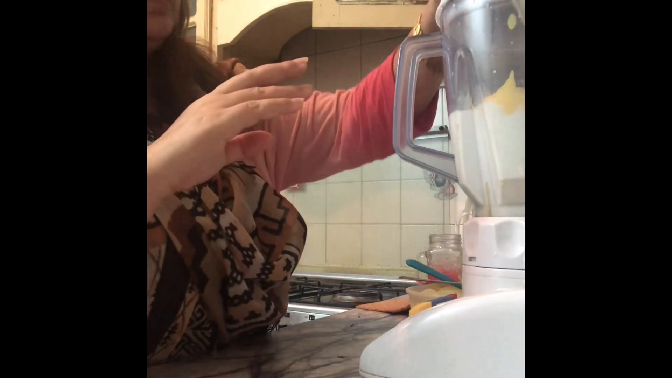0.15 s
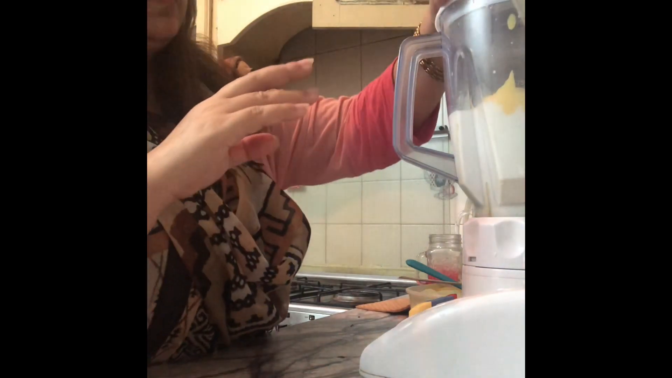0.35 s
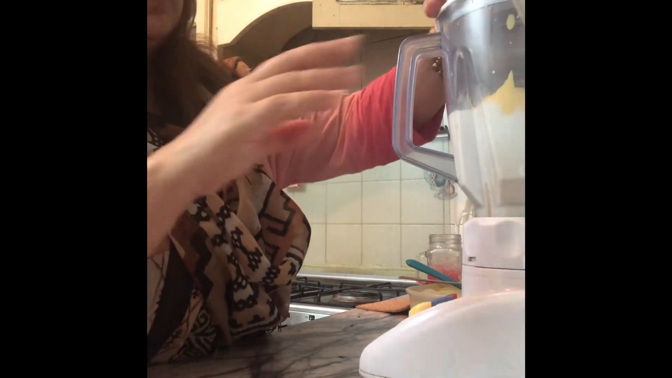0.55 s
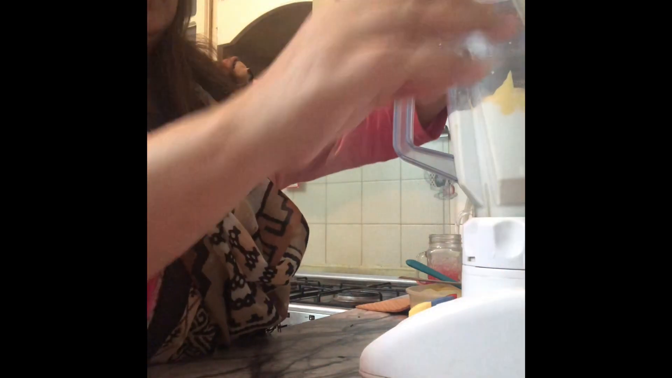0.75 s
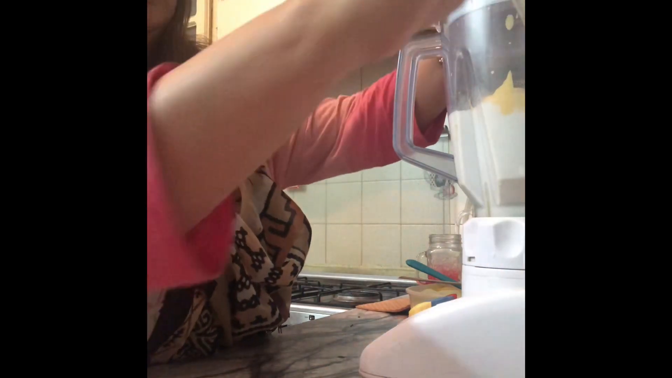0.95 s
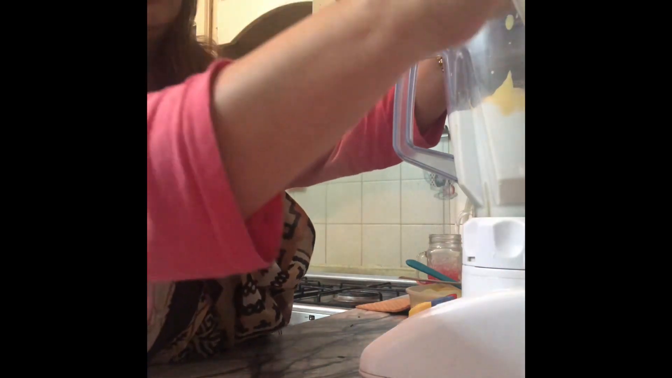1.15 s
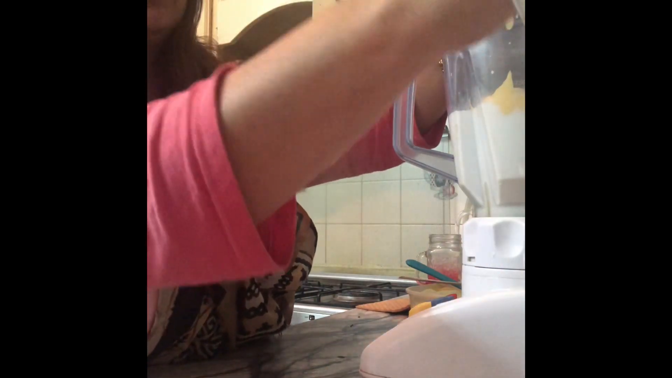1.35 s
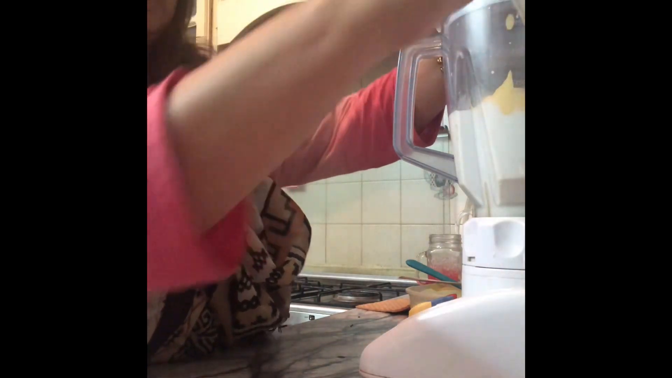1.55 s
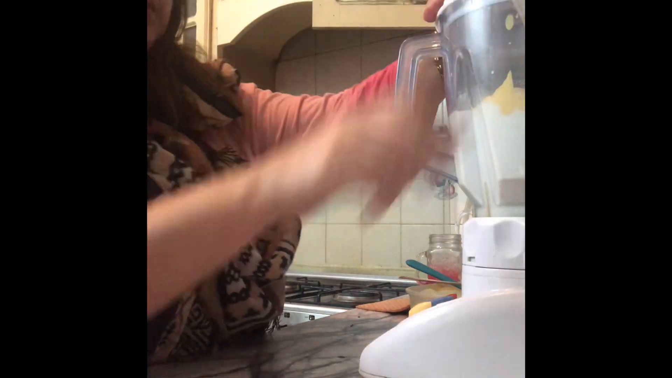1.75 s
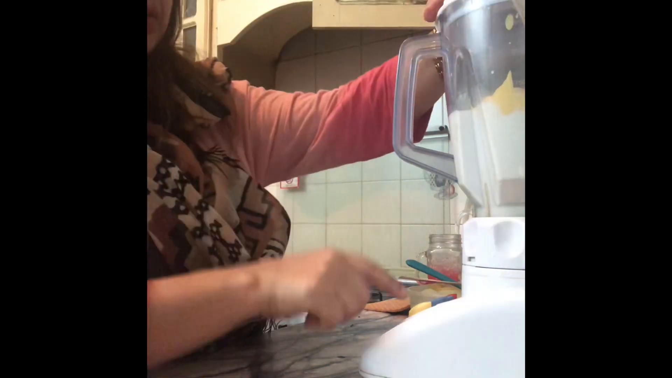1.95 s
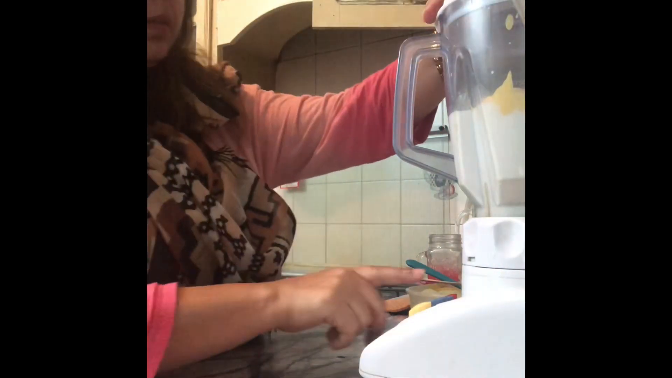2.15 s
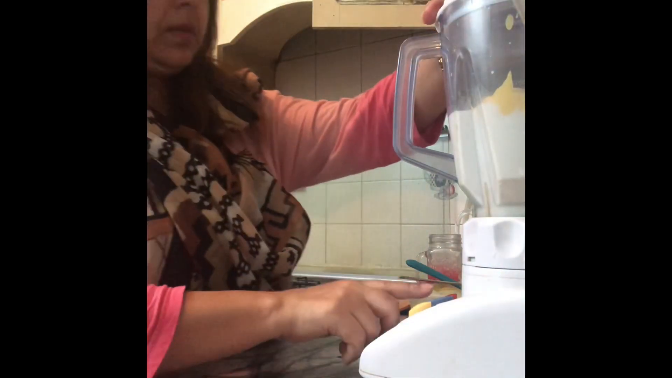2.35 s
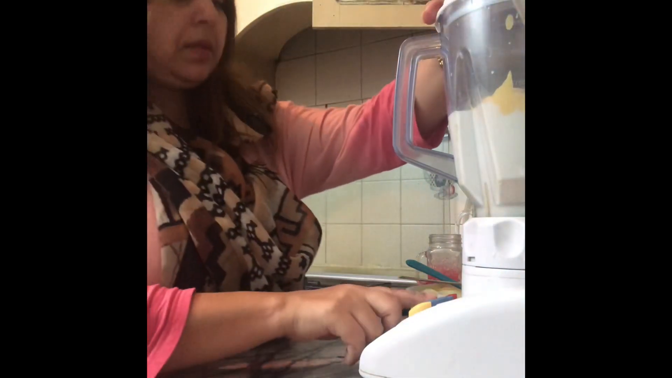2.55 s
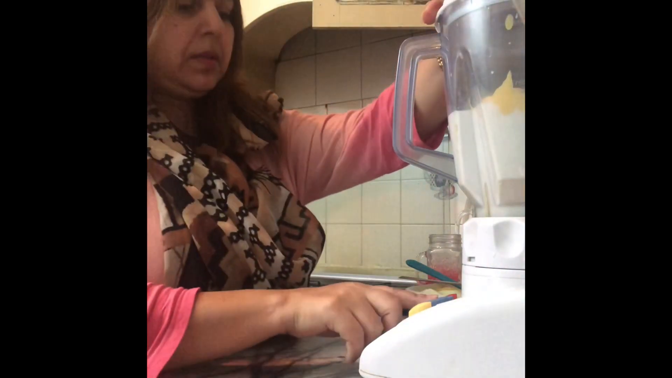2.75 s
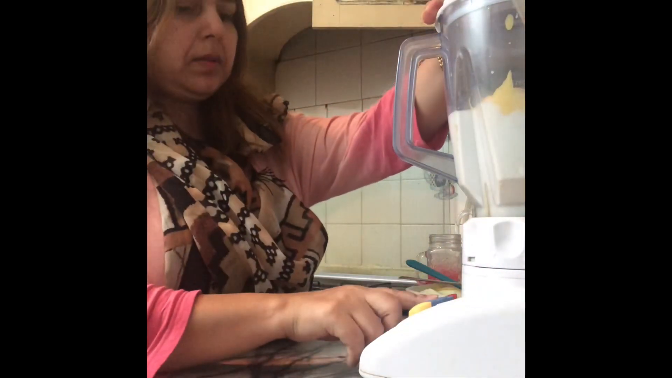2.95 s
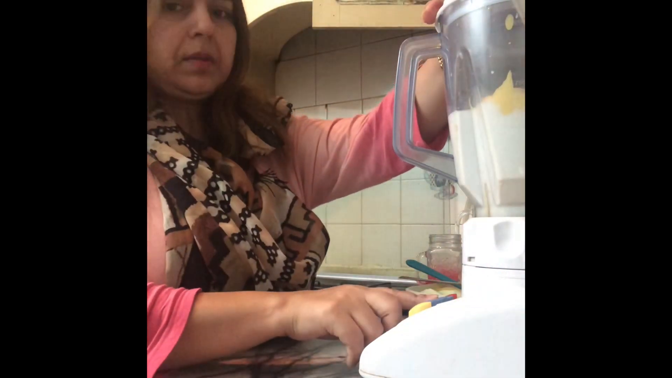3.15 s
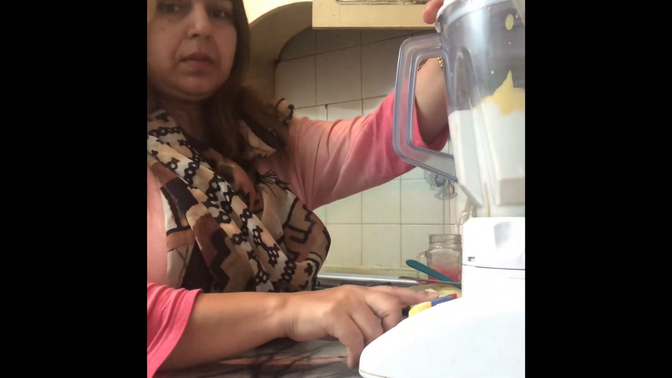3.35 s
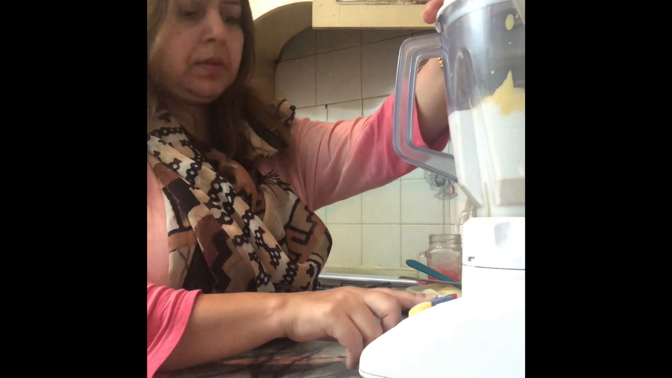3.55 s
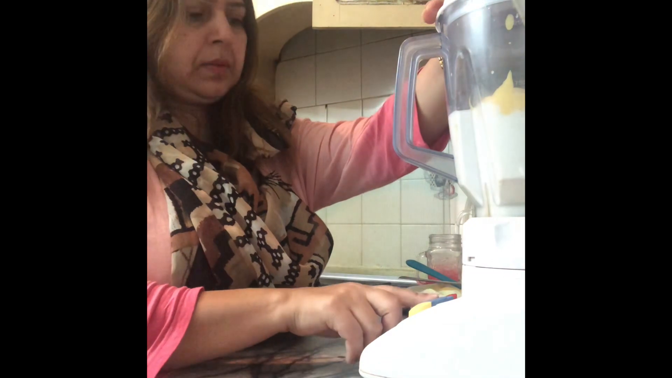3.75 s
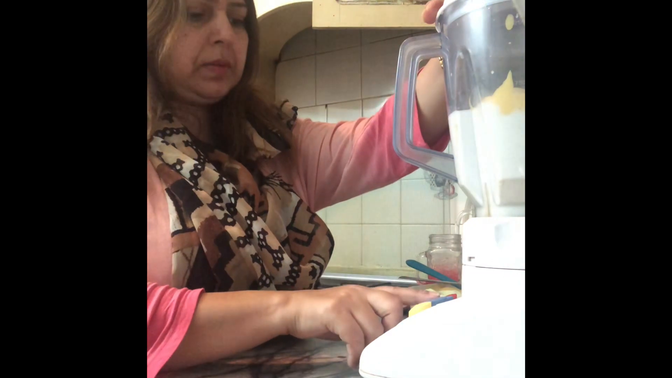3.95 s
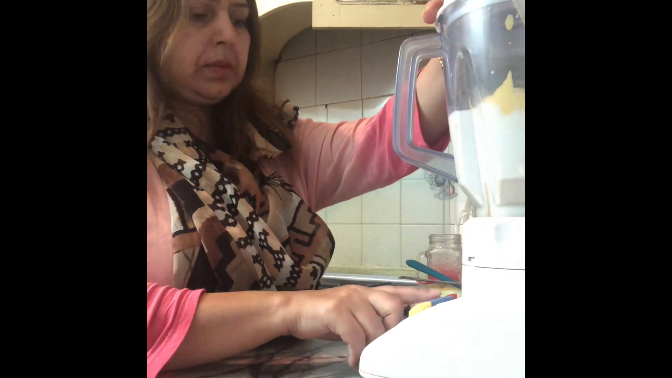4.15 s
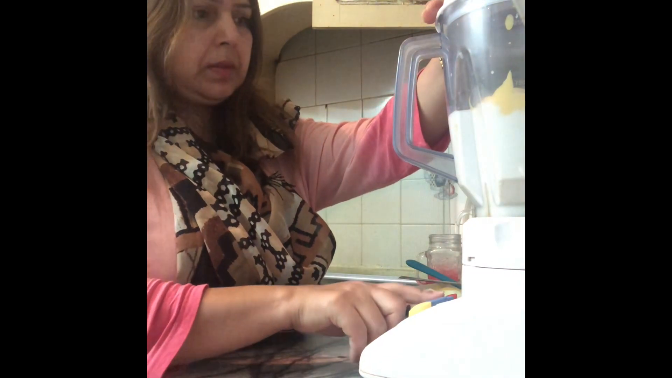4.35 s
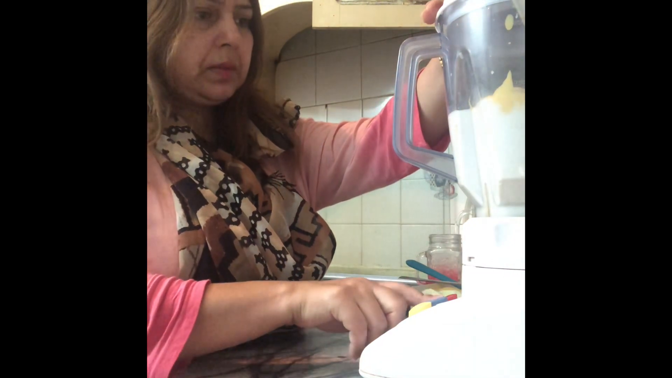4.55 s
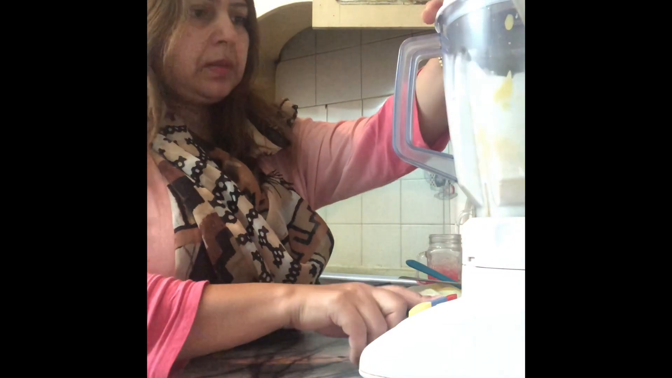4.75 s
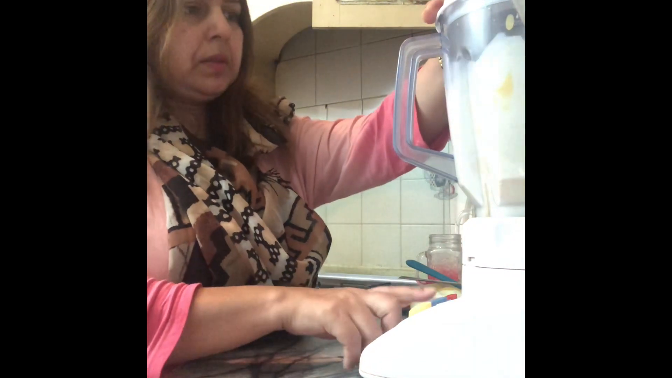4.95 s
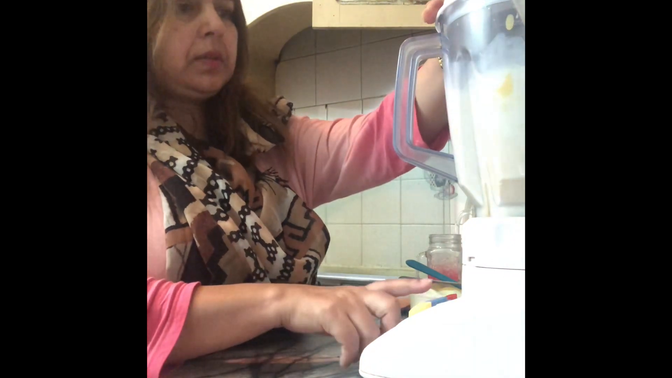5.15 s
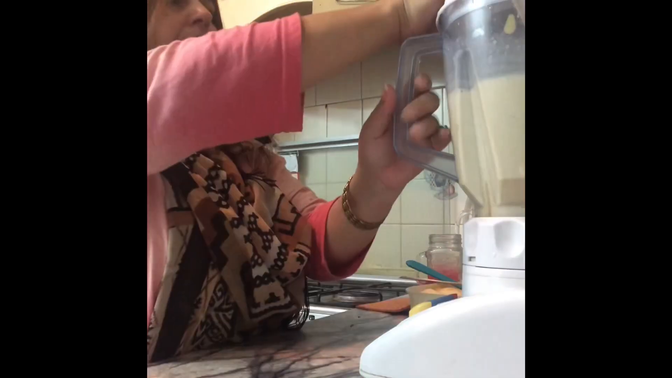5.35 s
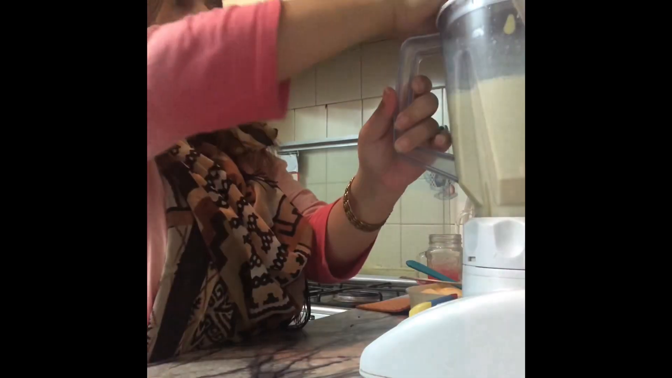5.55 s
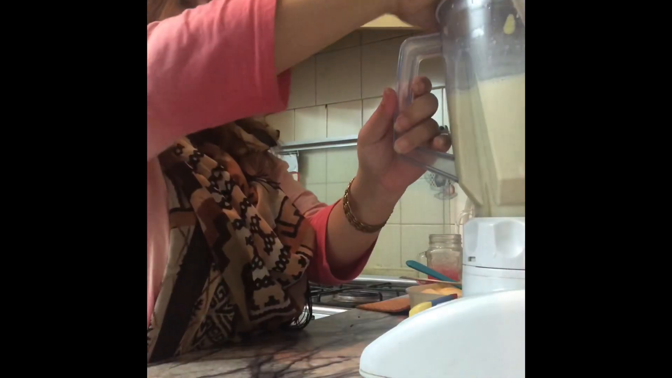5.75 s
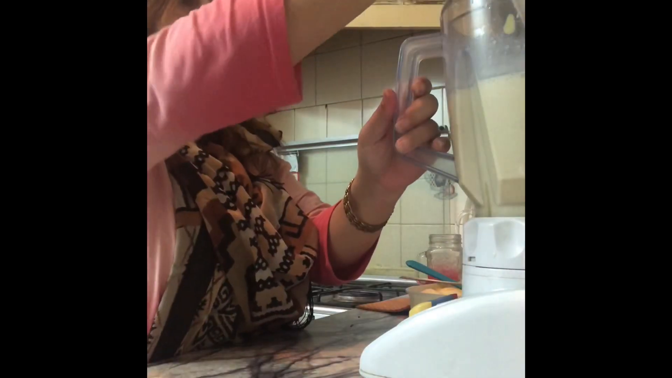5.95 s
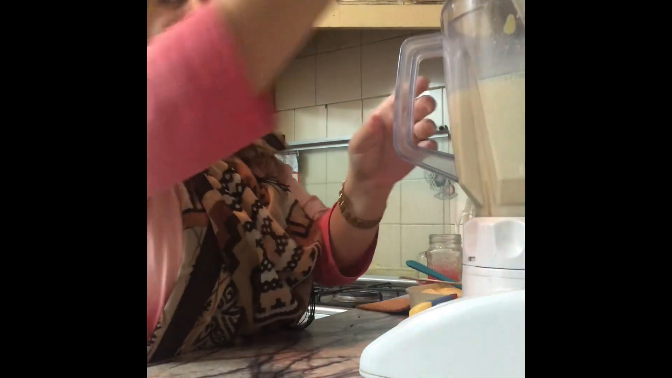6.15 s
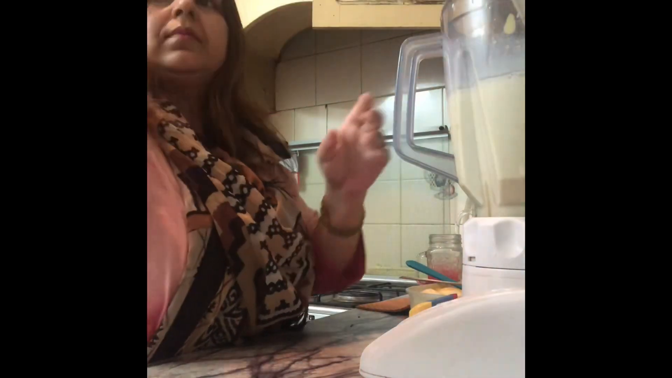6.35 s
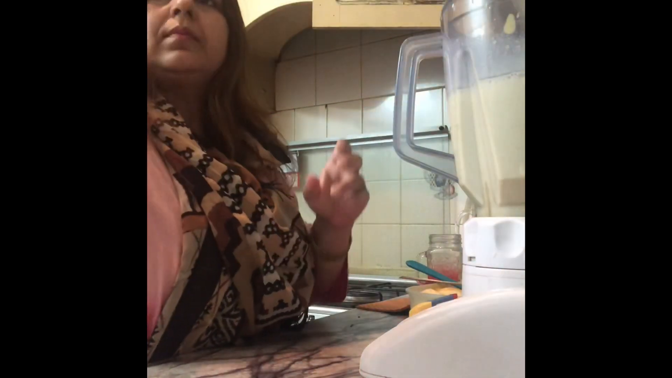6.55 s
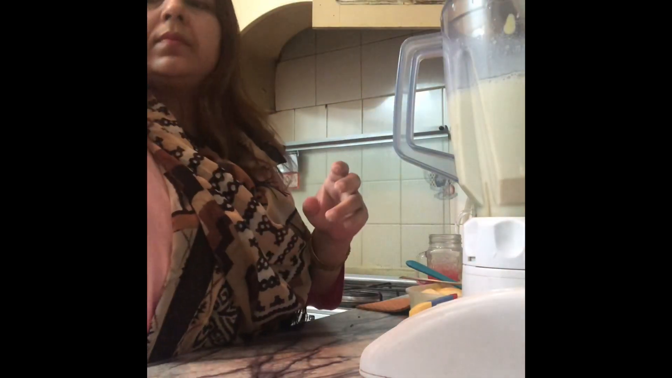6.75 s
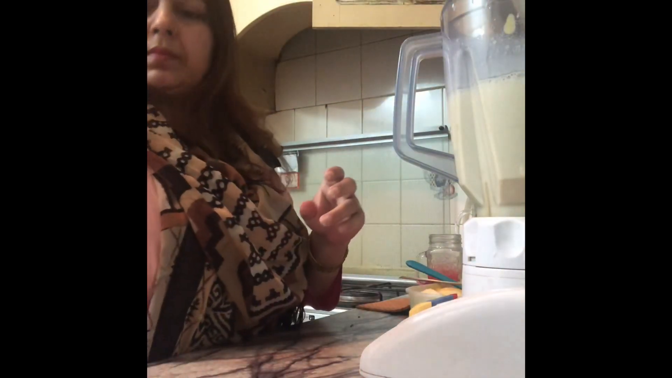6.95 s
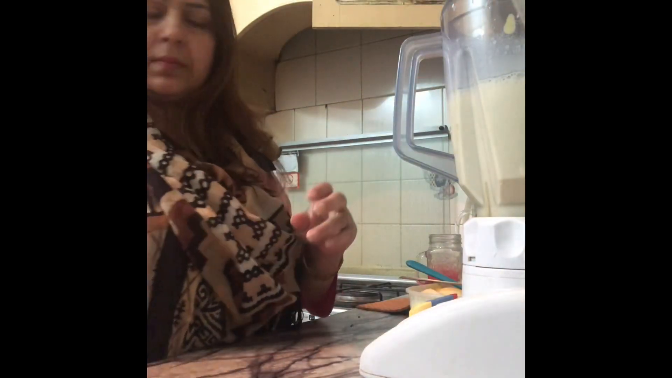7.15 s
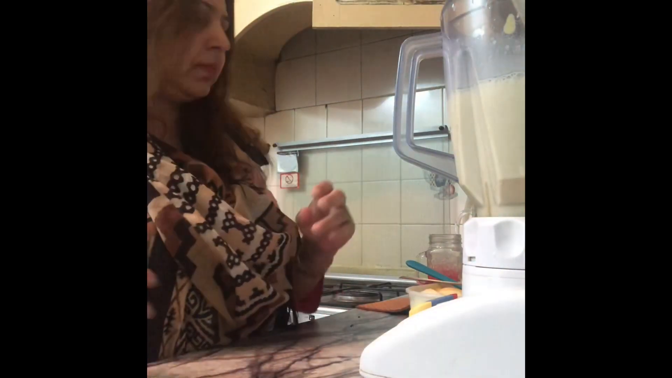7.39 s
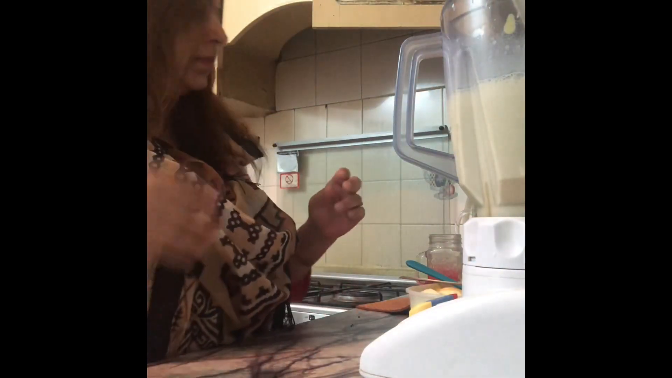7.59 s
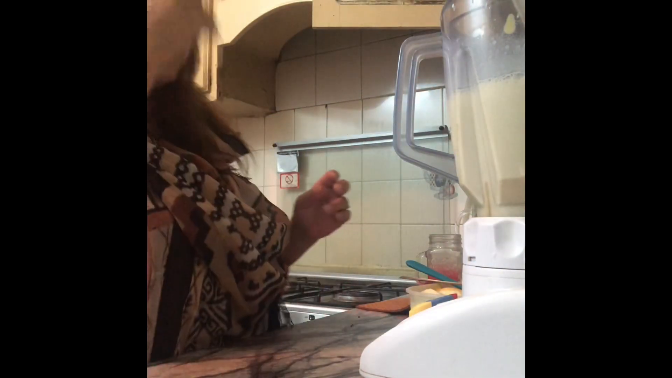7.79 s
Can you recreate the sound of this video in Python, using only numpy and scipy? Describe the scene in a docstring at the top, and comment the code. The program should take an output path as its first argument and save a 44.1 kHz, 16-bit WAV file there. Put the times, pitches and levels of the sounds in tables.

```python
"""A tiled kitchen, with a low hush and a faint fridge hum. Hands rub and tap a hollow plastic blender jar;
its lid squeaks, thumps home and snaps tight. Blades churn a thick, lumpy mix over a motor whine for
under a second, then the sound cuts off abruptly. The lid is worked loose; a bracelet jingles faintly.
Further off a sheet-metal door bangs shut and rebounds; its thin panel goes on booming and chattering."""
import sys
import numpy as np
from scipy import signal
from scipy.fft import rfft, irfft, next_fast_len
from scipy.io import wavfile
from scipy.ndimage import uniform_filter1d, map_coordinates

SR = 44100
rng = np.random.default_rng(int(sys.argv[2]) if len(sys.argv) > 2 else 0)


def dump_mix(stems):
    """Bounce the given channels to the path in sys.argv[1] as a 16-bit WAV at rate SR."""
    frames = np.atleast_2d(stems).T  # one column per channel
    limited = np.clip(frames, -1, 1)  # hard clip at full scale
    pcm = np.round(limited * 32767).astype(np.int16)
    wavfile.write(sys.argv[1], SR, pcm)


N = 344862

# tiled room decay: (frequency [Hz], t60 [s])
ROOM_DECAY = [(80, 0.81), (300, 0.68), (1000, 0.41), (3000, 0.54), (7000, 0.39), (15000, 0.32)]
# house hush: (frequency [Hz], level [dB])
HUSH_SPECTRUM = [(25, -25.5), (50, -19), (80, -9.5), (120, 1.5), (165, -13.5), (260, -10), (400, -13.5),
                 (600, -18.5), (900, -23.5), (1400, -30), (1780, -32.5), (2100, -32), (7500, -37.5),
                 (15500, -49.5)]
# fridge partials: (frequency [Hz], level [dB])
FRIDGE_TONES = [(101, -69), (200, -67), (255, -66.5), (715, -77), (1755, -83.5)]
# hand and sleeve strokes: (time [s], length [s], scrape [dB], hollow re scrape [dB], tilt [dB/oct])
STROKES = [(-.04, 0.18, -51, 8.5, -8), (.405, 0.13, -44, 5.5, -5), (0.524, 0.078, -51.5, 16.5, -6),
           (1.894, .16, -55.5, 3.5, -1), (2.625, 0.24, -56, -3, -2.5), (4.311, 0.057, -52.5, 3, -9.5),
           (5.21, 0.26, -60, 9.5, -3), (5.419, 0.33, -53, 12, -5.5), (5.549, 0.13, -47.5, 16, -7),
           (5.805, 0.061, -45, 4, -1.5), (6.367, 0.13, -64, 5, 2.5), (6.488, 0.093, -64, -3, 3),
           (7.241, 0.21, -54, 0.5, -3.5)]
# hollow jar: (frequency [Hz], width [Hz], gain [dB])
JAR_PEAKS = [(79, 32, 4.5), (166, 15, 8), (278, 19, 4.5), (327.8, 18, 8.5), (460.2, 50, -4.5),
             (870, 370, 2), (1020, 330, -2), (1250, 160, -3), (1750, 330, -0.5), (2630, 300, 0),
             (3590, 330, -2), (5920, 600, 4), (7260, 340, 5), (10000, 460, -3.5)]
# three lid squeaks, then two bracelet jingles: (time [s], frequency [Hz], length [s], level [dB])
SHORT_TONES = [(0.1287, 5980, 0.0077, -13), (.129, 9700, 0.0044, -23), (5.571, 330.4, 0.026, -15),
               (6.37, 5850, 0.065, -59.5), (6.482, 5950, .06, -65)]
# knocks on jar and base: (time [s], body [dB], thump re body [dB], tilt [dB/oct])
JAR_KNOCKS = [(.129, -30.5, 1, 0), (.142, -15, 1, -.5), (.435, -38, 10, -6), (.483, -37, 6, -9),
              (.544, -44.5, 12.5, -5), (.642, -47, -3, -4.5), (.663, -40, 4.5, -12.5),
              (1.164, -67.5, -4, 6), (1.667, -55, 7, -9), (1.936, -40, -3.5, -3.5), (2.168, -50, 1.5, -9),
              (4.408, -53, -2, -2), (4.424, -43.5, -3, 1.5), (5.228, -61, 20.5, -0.5),
              (5.308, -59.5, 16.5, -1.5), (5.383, -50.5, 8.5, -5.5), (5.443, -44, 9.5, -4.5),
              (5.508, -48, 0, -3), (5.548, -48, 10, -5), (5.577, -40, 2, -8.5), (5.609, -38, 8.5, -7),
              (5.805, -47.5, 6.5, 0), (5.831, -45, -4, 0.5), (6.030, -45, -1, -3), (6.066, -53.5, 10.5, -7),
              (6.164, -54.5, -2, -2.5)]
# lid catch: (frequency [Hz], level [dB], t60 [s])
CATCH_MODES = [(620, -17.5, .03), (785, -11.5, 0.029), (1200, -17, .015), (1705, -14, 0.014),
               (1760, -52.5, 2.2), (2370, -4.5, 0.015), (2465, -31.5, .25), (2560, -29, .22),
               (2742, -11, .016), (3740, -15, 0.0083), (4800, -7.5, 0.0082), (5630, -4.5, .01),
               (5520, -28.5, .2), (5560, -27.5, .18), (7323, 2.5, 0.0083), (7450, -24.5, .18),
               (8100, -13, .008), (11000, -4, .007), (13500, -25, .006)]
# blade load: (time [s], level [dB])
BLADE_BITE = [(4.44, -29), (4.53, -18.5), (4.58, -16.5), (4.66, -16.5), (4.75, -18), (4.85, -10),
              (4.92, -9.5), (4.975, -17.5), (5.01, -15.5), (5.13, -13), (5.19, -18.5)]
# rotor-slot whine, sagging under load: (time [s], frequency [Hz])
WHINE_PITCH = [(4.52, 2480), (4.62, 2397), (4.72, 2349), (4.80, 2491), (4.93, 2416), (5.0, 2666),
               (5.06, 2711), (5.14, 2455), (5.2, 2624)]
# filled jar on its base: (frequency [Hz], width [Hz], gain [dB])
FILLED_PEAKS = [(71, 11, 3.5), (200, 19.3, 5.5), (410, 78, 7.5), (551.3, 18, 7), (863, 46, 6.5),
                (996, 43, -12.5), (1171, 73, 5.5), (1426, 32, -9), (2132, 100, 0), (4150, 100, -3),
                (5370, 82, -5.5), (7300, 650, 0.5)]
# churning mix: (frequency [Hz], level [dB])
MIX_SPECTRUM = [(24, -46.5), (40, -25.5), (69, 3), (133, -4.5), (329, 4), (382, -11), (422, -1), (491, -7),
                (556, 0.5), (852, -1.5), (1720, -12), (2630, -23), (3060, -25.5), (7540, -33.5),
                (16000, -34)]
# lumps on the blades: (time [s], body [dB], thump re body [dB], tilt [dB/oct])
LUMP_HITS = [(4.454, -32.5, -20.5, -6.5), (4.465, -27, -12.5, -4.5), (4.549, -15.5, -14, -6),
             (4.578, -16.5, -14, -11), (4.608, -21, 0.5, -6), (4.66, -19, 8, -7), (4.709, -15.5, -5, -10),
             (4.899, -21.5, -7.5, -4.5), (4.928, -17.5, -1.5, -7.5), (4.958, -25, 10.5, -12.5),
             (5.0, -11, -13, -12.5), (5.122, -11, -21, -12.5), (5.168, -22, 2, -10.5)]
# door blows, then loose knocks: (time [s], level [dB], tilt [dB/oct])
DOOR_BLOWS = [(6.654, -17.5, 4), (6.671, -13.5, -1), (6.695, -11.5, -6), (6.884, -24.5, 1.5),
              (6.91, -28.5, -1), (7.169, -47.5, 4), (7.365, -44, -2), (7.54, -47.5, 3.5), (7.637, -42, -5),
              (7.725, -48.5, -1.5)]
# one door blow: (frequency [Hz], level [dB])
BLOW_SPECTRUM = [(24, -57.5), (40, -46), (127, -8.5), (249, -6), (290, -16), (320, 0), (412, -38), (455, 1),
                 (715, -8), (918, -4), (1180, -10), (2100, -22), (3830, -26.5), (16000, -53.5)]
# door frame: (frequency [Hz], level [dB], t60 [s])
FRAME_MODES = [(124.3, -16.5, 0.49), (166, -17.5, 0.19), (209.4, -23.5, 0.42), (335.6, -29, 1),
               (388, -33.5, 0.85), (441, -23.5, 0.41), (663, -28, 0.22), (916, -28, 0.15)]
# door panel: (frequency [Hz], level [dB], t60 [s])
PANEL_MODES = [(64.6, -43.5, 3.2), (91.5, -42, 5.2), (112, -30, 0.67), (126, -38.5, 5), (152, -44, 3.2),
               (173, -42.5, 1.9), (206, -45, 3.5), (299, -46, 1.9), (366, -52.5, 2.6), (543, -55.5, 2.8)]
# loose panel in its frame: (frequency [Hz], level [dB])
CHATTER_SPECTRUM = [(59, -29), (100, 5), (132, -7.5), (241, -10.5), (383, -14.5), (415, -18.5), (819, -22),
                    (1590, -41.5), (1750, -47), (12000, -61.5), (15600, -88), (22000, -120)]
# thump, body, clack and tick of a strike: (low edge [Hz], high edge [Hz])
REGISTERS = [(65, 400), (400, 1500), (1500, 5000), (5000, 16000)]

START_S, CUT_S, SPIN_UP_S = 4.428, 5.202, .026
GRIP_S, GRIP_DB = .16, 23.5  # blades take hold of the mix
MAINS_HZ, ROTOR_SLOTS = 50, 12
THUD_S, REBOUND_S = 6.664, 6.895


def amp(db):
    """Decibels to gain."""
    return 10 ** (np.asarray(db) / 20)


def unit(x):
    """Scale to rms 1."""
    return x / np.sqrt(np.mean(x ** 2))


def fade(t, t60_s):
    """Exponential decay."""
    return np.exp(-np.log(1000) * t / max(t60_s, 1e-3))


def rise(t, attack_s):
    """Linear ramp, 0 to 1."""
    return np.clip(t / attack_s, 0, 1)


def seconds(length_s):
    """Time axis."""
    return np.arange(int(length_s * SR)) / SR


def add(out, at_s, x):
    """Mix x in, cropped to the scene."""
    i = int(at_s * SR)
    x, i = x[max(-i, 0):], max(i, 0)
    out[i:i + len(x)] += x[:max(N - i, 0)]


def band(x, lo_hz, hi_hz):
    """Band-pass."""
    sos = signal.butter(3, [lo_hz, min(hi_hz, SR / 2 - 1000)], "band", fs=SR, output="sos")
    return signal.sosfilt(sos, x)


def colour(x, spectrum):
    """Filter by a spectrum table."""
    hz, db = np.transpose(spectrum)
    size = next_fast_len(len(x))
    bins_hz = np.maximum(np.fft.rfftfreq(size, 1 / SR), 1)
    gain = amp(np.interp(np.log(bins_hz), np.log(hz), db))
    return irfft(rfft(x, size) * gain, size)[:len(x)]


def resonate(x, peaks):
    """Add resonant peaks."""
    return x + sum(amp(db) * signal.lfilter(*signal.iirpeak(hz, hz / width_hz, SR), x)
                   for hz, width_hz, db in peaks)


def ring(modes, t):
    """Decaying sines, random phase."""
    return sum(amp(db) * fade(t, t60_s) * np.sin(2 * np.pi * (hz * t + rng.random()))
               for hz, db, t60_s in modes)


def walk(n, rate_hz):
    """Smooth noise, spread near 1."""
    step = int(SR / rate_hz)
    return 1.3 * uniform_filter1d(np.repeat(rng.standard_normal(n // step + 1), step), step)[:n]


def grains(n, per_s, spread_db):
    """Dense tiny impacts of uneven size."""
    impacts = rng.standard_normal(n) * (rng.random(n) < per_s / SR)
    return impacts * amp(spread_db * np.minimum(rng.exponential(size=n), 4))


def kitchen(x, wet_db):
    """Direct sound plus diffuse ring of tiled walls."""
    t = seconds(.8)
    edges_hz = 45 * 1.5 ** np.arange(16)
    hz, t60_s = np.transpose(ROOM_DECAY)
    tail = np.zeros(len(t))
    for lo, hi in zip(edges_hz, edges_hz[1:]):
        band_t60_s = np.interp(np.log(lo * hi) / 2, np.log(hz), t60_s)
        tail += band(rng.standard_normal(len(t)), lo, hi) * fade(t, band_t60_s)
    tail *= rise(t - .003, .00089)
    return x + amp(wet_db) * signal.fftconvolve(x, tail / np.linalg.norm(tail))[:N]


def fridge():
    """Faint hum, wavering in level and pitch."""
    return sum(amp(db + 2 * walk(N, 5)) * np.sin(2 * np.pi * np.cumsum(hz + 5 * walk(N, 12)) / SR)
               for hz, db in FRIDGE_TONES)


def hush(level_db):
    """Low noise of the house."""
    return amp(level_db) * unit(colour(rng.standard_normal(N), HUSH_SPECTRUM)) * amp(.4 * walk(N, 11))


def rubbing(uneven_db, attack_share, fall_db):
    """Friction grains excite the hollow jar; each stroke presses in, then eases off."""
    out = np.zeros(N)
    for at_s, length_s, db, hollow_db, tilt in STROKES:
        t = seconds(length_s)
        along = t / length_s
        pressure = rise(along, attack_share) * amp(-fall_db * np.maximum(along - attack_share, 0))
        contacts = grains(len(t), 12000, 1.6) * amp(uneven_db * walk(len(t), 70))
        friction = resonate(contacts, JAR_PEAKS)
        hollow = amp(hollow_db) * unit(band(friction, 200, 500))
        scrape = unit(band(friction, 550, 3000))
        hiss = amp(2 * tilt) * unit(band(friction, 2600, 21050))
        add(out, at_s, amp(db) * (hollow + scrape + hiss) * pressure * signal.windows.tukey(len(t), .08))
    return out


def squeaks_and_jingles():
    """Short wavering tones: lid squeaks, then two faint high bracelet jingles."""
    out = np.zeros(N)
    for at_s, hz, length_s, db in SHORT_TONES:
        t = seconds(length_s)
        cycles = np.cumsum(hz * (1 + .0061 * walk(len(t), 600))) / SR
        add(out, at_s, amp(db) * np.sin(np.pi * t / length_s) * np.sin(2 * np.pi * cycles))
    return out


def strikes(hits, peaks, body_t60_s, bass_stretch, tick_db):
    """Rattling contacts ring the jar; harder is brighter, lows ring longest."""
    out, t = np.zeros(N), seconds(.25)
    clack_oct, tick_oct = 1.8, 3.5
    for at_s, db, thump_db, tilt in hits:
        noise = resonate(rng.standard_normal(len(t)), peaks) * rise(t, .0018)
        offsets_db = thump_db, 0, tilt * clack_oct, tilt * tick_oct + tick_db
        for (lo, hi), offset_db, stretch in zip(REGISTERS, offsets_db, (bass_stretch, 1, .8, .65)):
            blow = band(noise * fade(t, body_t60_s * stretch), lo, hi)
            blow *= np.sqrt(SR * .016) / np.linalg.norm(blow)  # energy of 16 ms at rms 1
            add(out, at_s, amp(db + offset_db) * blow)
    return out


def snap(at_s, gain_db, crack_db):
    """The catch jumps its ridge: crack, short plastic ring, faint after-ring of the jar."""
    out, t = np.zeros(N), seconds(.3)
    crack = unit(band(rng.standard_normal(len(t)), 700, 16000)) * fade(t, t60_s=.025)
    add(out, at_s, amp(gain_db) * (ring(CATCH_MODES, t) + amp(crack_db) * crack))
    return out


def churning(turns, pull, grip_db, bite_db):
    """Blades beat the mix against the jar once a turn: slosh, churn, spray."""
    n = len(turns)
    beat = 1 + .5 * np.cos(2 * np.pi * turns)
    impacts = grains(n, 8000, 1.5) * beat * (1 + .3 * pull)
    mix = colour(resonate(impacts, FILLED_PEAKS), MIX_SPECTRUM)
    heave = np.cumsum(.025 * walk(n, 16))  # heaving mix shifts the resonances
    mix = map_coordinates(mix, [np.arange(n) + heave], order=3, mode="mirror")
    drops = grains(n, 25000, 1.6) * (1 + .14 * pull)
    fizz = colour(resonate(drops, FILLED_PEAKS), MIX_SPECTRUM)
    slosh = amp(grip_db - 18) * unit(band(mix, 62, 359))
    churn = amp(bite_db - .5) * unit(band(mix, 330, 3000) * amp(.92 * walk(n, 40)))
    spray = amp(.56 * grip_db - 30.5) * unit(band(fizz, 2680, 22000)) * amp(1.1 * walk(n, 70))
    return slosh + churn + spray


def whine(slot_cycles, slot_hz, pull, bite_db):
    """Rotor-slot tone; grows with load and, steeply, with speed."""
    tone = (.23 + pull) * np.sin(2 * np.pi * slot_cycles) * amp(2.8 * walk(len(pull), 250))
    load_db = (bite_db - bite_db.mean()) / 2
    return unit(tone) * amp(load_db - 28.5) * (slot_hz / slot_hz.max()) ** 7


def splash(at_s, length_s, hz, db):
    """First spray sizzles on the dry upper jar wall."""
    out, t = np.zeros(N), seconds(length_s)
    drops = unit(band(grains(len(t), 8300, 2.6), hz - 700, hz + 700))
    add(out, at_s, amp(db) * drops * rise(t, .0067) * (1 - t / length_s))
    return out


def blender():
    """The motor spins up, pulls once per mains cycle, flutters under load; the sound cuts off abruptly."""
    run_s = seconds(1)
    t = START_S + run_s
    grip_db = GRIP_DB * np.minimum(run_s / GRIP_S - 1, 0)
    bite_db = np.interp(t, *np.transpose(BLADE_BITE))
    slot_hz = (1 - np.exp(-run_s / SPIN_UP_S)) * np.interp(t, *np.transpose(WHINE_PITCH))
    pull = np.cos(np.pi * MAINS_HZ * (t - 4.434)) ** 4
    slot_cycles = np.cumsum(slot_hz * (1 + .025 * walk(len(t), 700))) / SR
    running = churning(slot_cycles / ROTOR_SLOTS, pull, grip_db, bite_db)
    running += whine(slot_cycles, slot_hz, pull, bite_db)
    out = splash(at_s=4.535, length_s=.17, hz=11240, db=-35)
    add(out, START_S, running * rise(run_s, .0049))
    out += strikes(LUMP_HITS, FILLED_PEAKS, body_t60_s=.062, bass_stretch=1.5, tick_db=4)
    gate = np.clip((CUT_S - np.arange(N) / SR) / .027 + .2, 0, 1)  # cuts the room tail too
    return kitchen(out, wet_db=-10.5) * gate


def door_slam(frame_db):
    """The door bangs into its frame, which thuds; loose knocks follow."""
    blows, t = np.zeros(N), seconds(.3)
    for at_s, db, tilt in DOOR_BLOWS:
        spectrum = [(hz, level_db + tilt * np.log2(hz / 500)) for hz, level_db in BLOW_SPECTRUM]
        rattle = unit(colour(rng.standard_normal(len(t)), spectrum))
        add(blows, at_s, amp(db) * rattle * fade(t, t60_s=.13) * rise(t, .0044))
    out, t = kitchen(blows, wet_db=-8), seconds(2)
    add(out, THUD_S, amp(frame_db) * ring(FRAME_MODES, t) * rise(t, .0095))
    return out


def door_panel(boom_db, flex):
    """The rebound sets the thin sheet booming and chattering; flex bends each mode's pitch, while each mode's
    level wavers on its own."""
    out, t = np.zeros(N), seconds(2)
    n = len(t)
    boom = np.zeros(n)
    for mode in PANEL_MODES:
        flexed_s = t + np.cumsum(flex * walk(n, 18)) / SR
        boom += ring([mode], flexed_s) * amp(3.3 * walk(n, 11.4))
    add(out, REBOUND_S, amp(boom_db) * boom * rise(t, .0095))
    contacts = colour(grains(n, 2500, 2.1), CHATTER_SPECTRUM)
    chatter = unit(band(contacts, 196, 10000)) * amp(2 * walk(n, 29.8))
    burst = amp(-26.5) * fade(t, t60_s=.36)
    linger = amp(-45) * fade(t, t60_s=10.2)
    add(out, REBOUND_S, chatter * (burst + linger) * rise(t, .089))
    return out


def scene():
    """Mono mix at the counter."""
    knocks = strikes(JAR_KNOCKS, JAR_PEAKS, body_t60_s=.05, bass_stretch=2.1, tick_db=-8)
    hands = kitchen(knocks + rubbing(uneven_db=2.5, attack_share=.22, fall_db=16.5), wet_db=-9)
    tones = kitchen(squeaks_and_jingles(), wet_db=-15.5)
    catch = kitchen(snap(at_s=1.3015, gain_db=-10, crack_db=-2.5), wet_db=-12)
    blending = blender()
    door = door_slam(frame_db=3) + door_panel(boom_db=4, flex=.0201)
    return (hands + tones + catch + blending + door + fridge() + hush(level_db=-58))[None]


def record(dry):
    """Microphone: 50 Hz high-pass, soft clip, 16 kHz low-pass."""
    thin = signal.sosfilt(signal.butter(3, 50, "high", fs=SR, output="sos"), dry)
    rounded = np.tanh(.68 * thin) / .73
    return signal.sosfilt(signal.ellip(10, .2, 80, 16000, fs=SR, output="sos"), rounded)


dry = scene()
out = record(dry)
dump_mix(out)
```